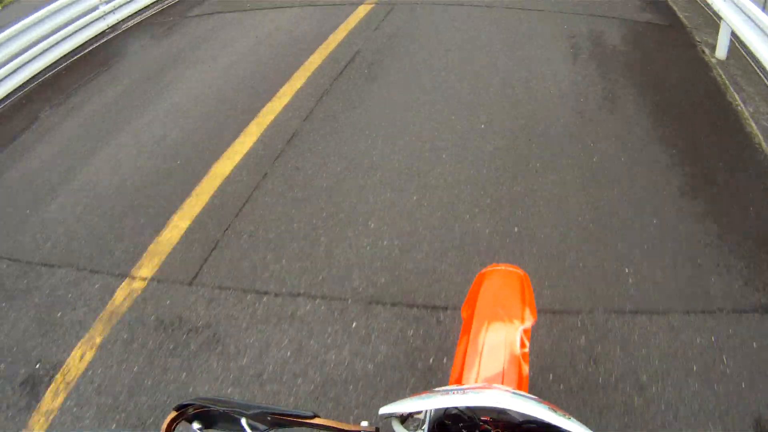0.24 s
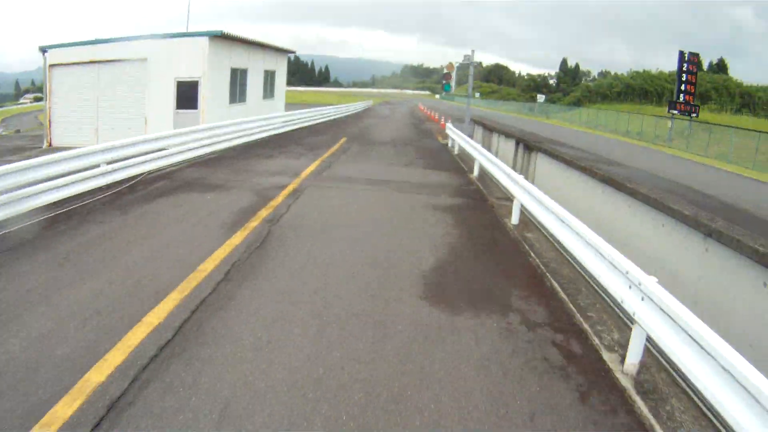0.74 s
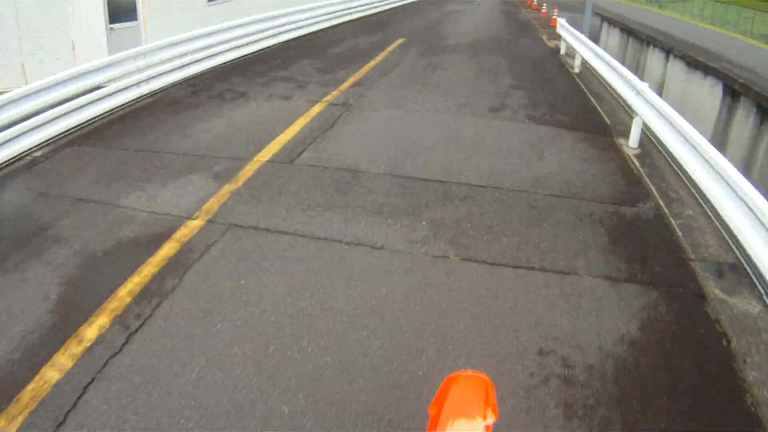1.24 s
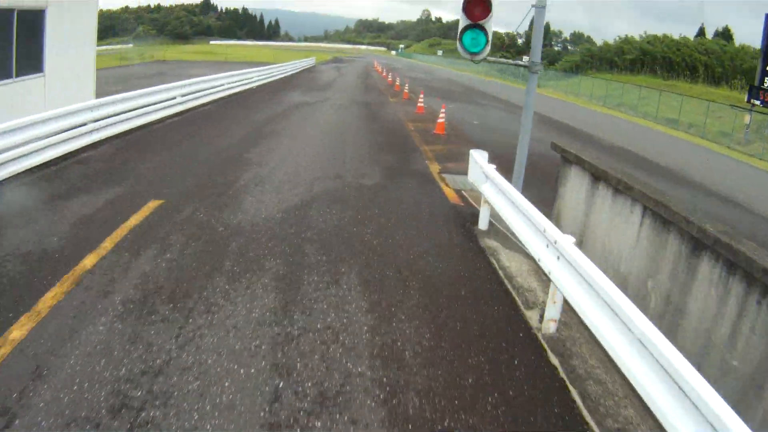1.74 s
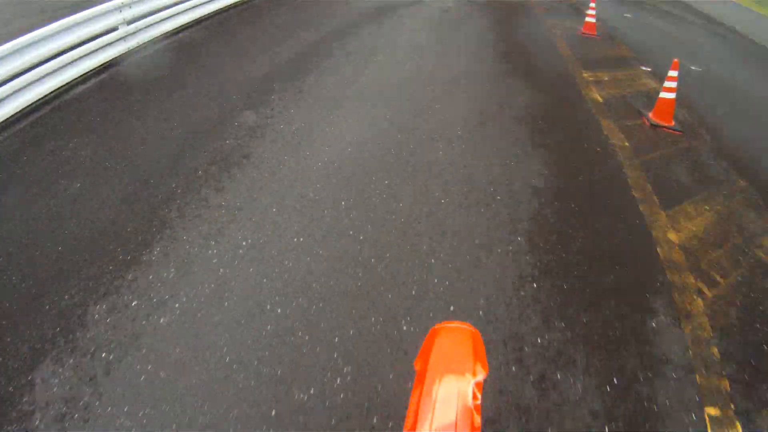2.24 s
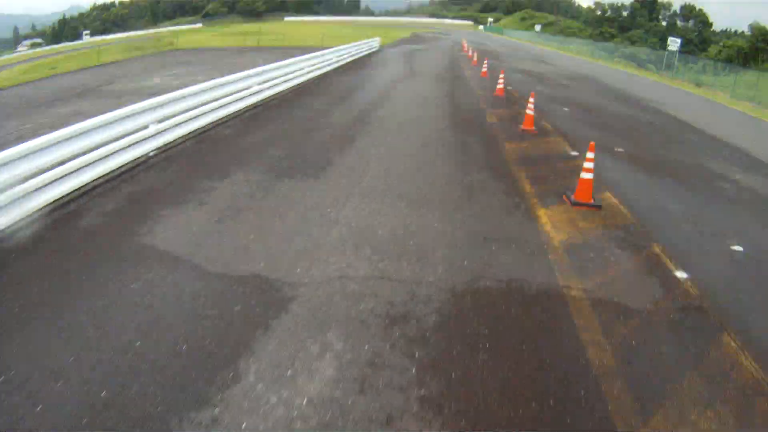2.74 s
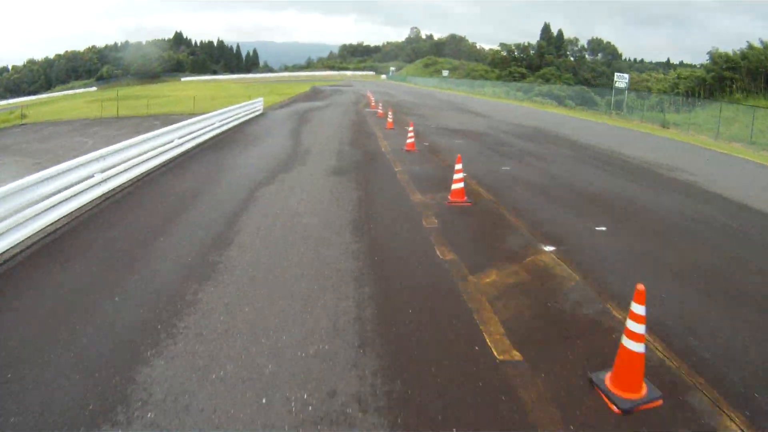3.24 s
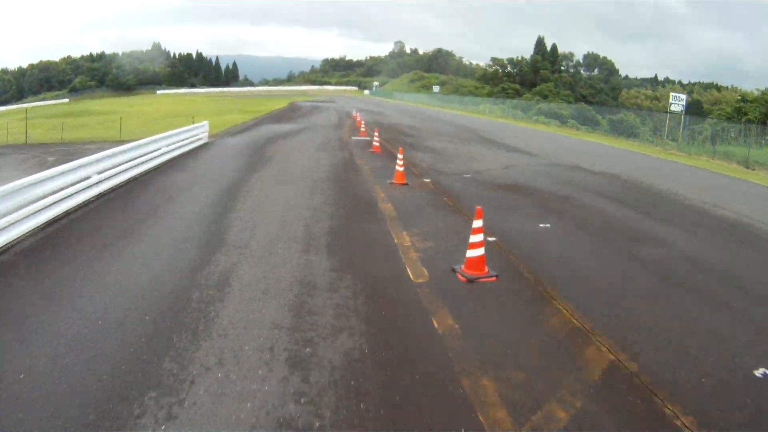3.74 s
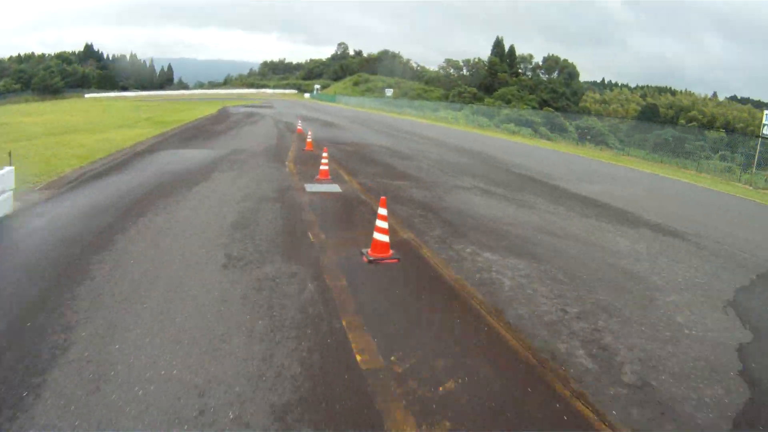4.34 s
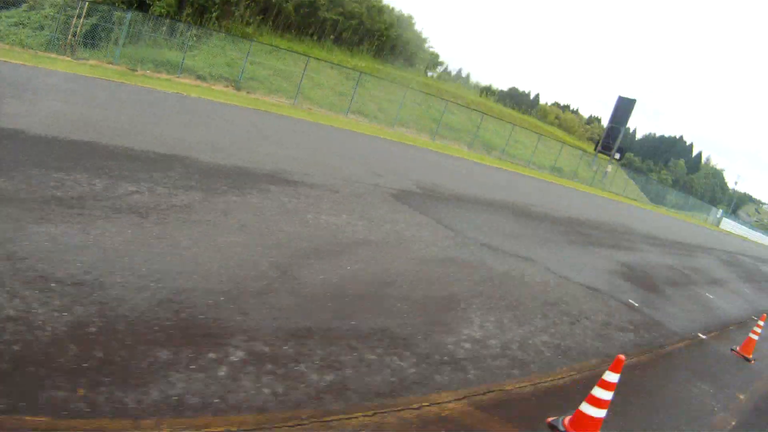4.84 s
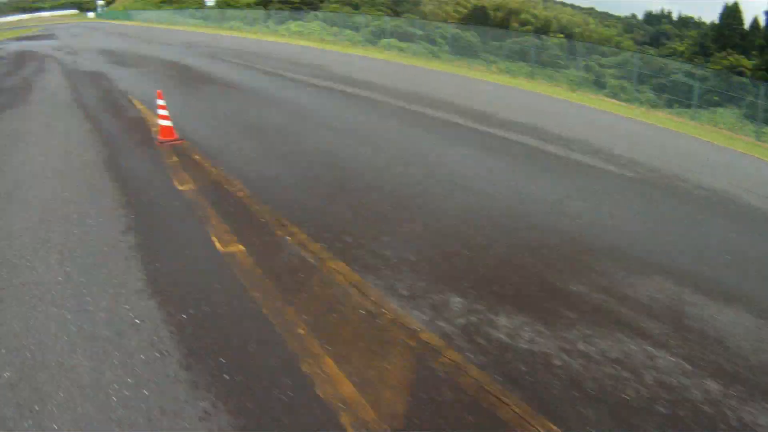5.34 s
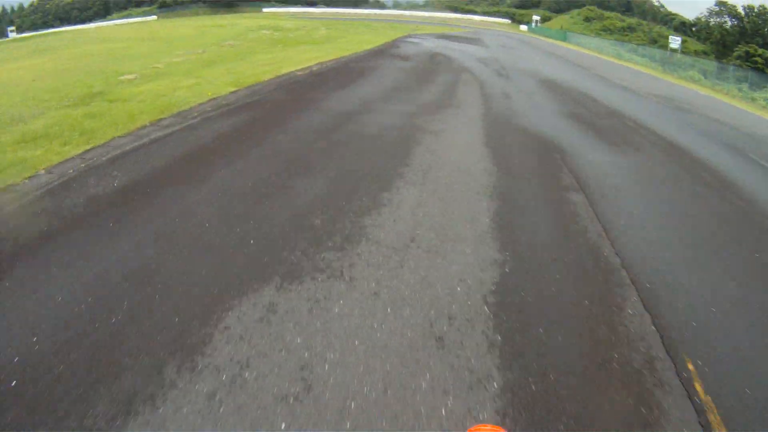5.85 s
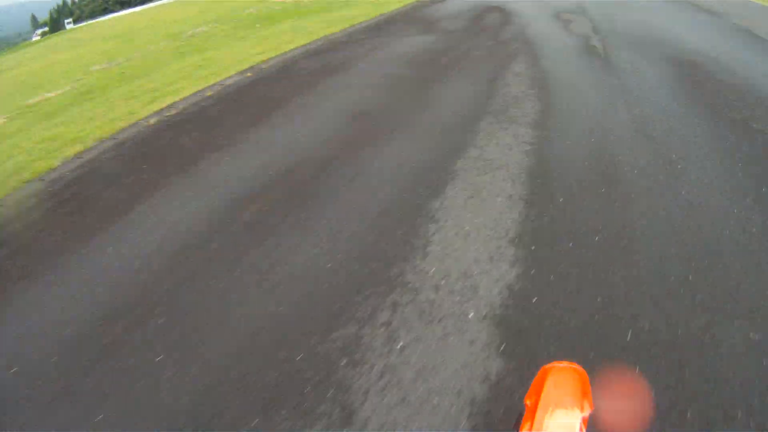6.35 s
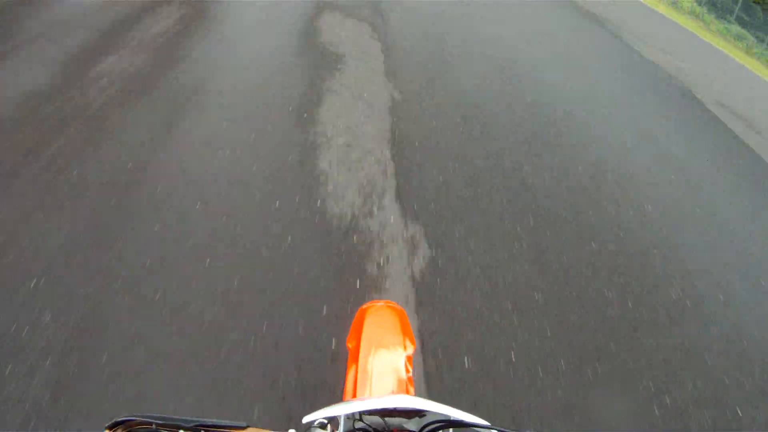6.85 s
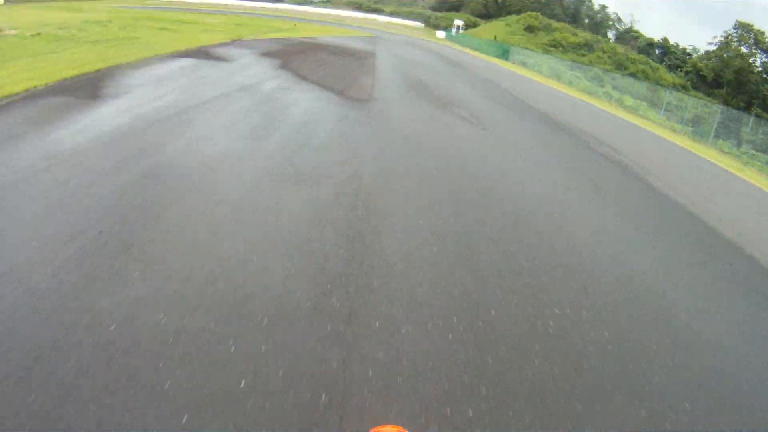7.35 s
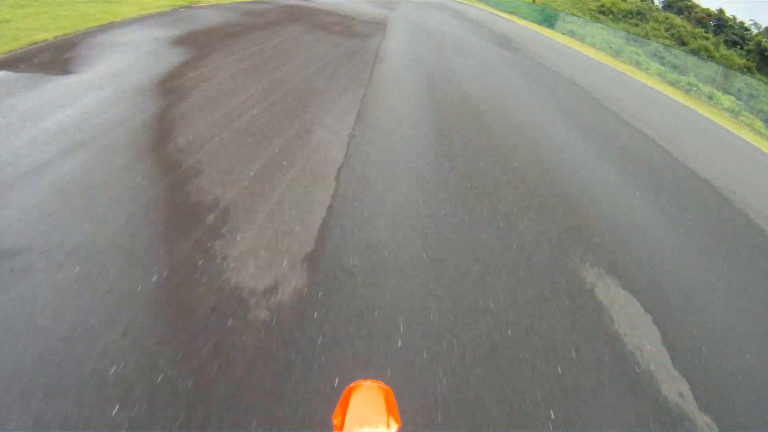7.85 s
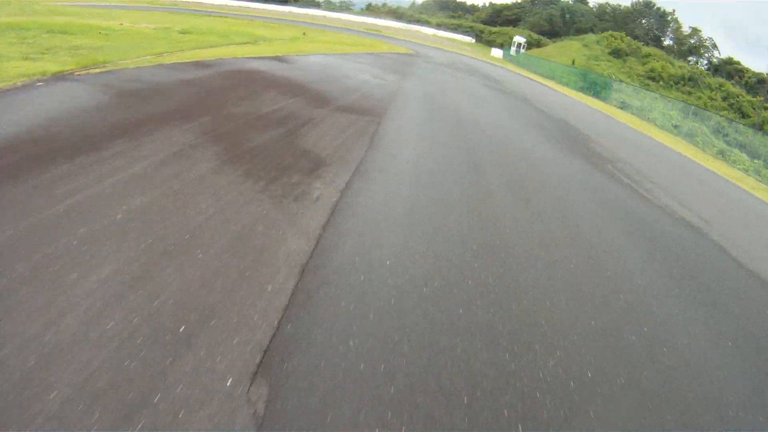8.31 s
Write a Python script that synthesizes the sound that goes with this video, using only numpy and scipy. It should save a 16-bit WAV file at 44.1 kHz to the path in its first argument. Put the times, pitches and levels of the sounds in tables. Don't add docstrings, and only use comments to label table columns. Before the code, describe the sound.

A single-cylinder motorcycle accelerates on open road, shifts up once around four seconds, while wind roar grows over a gritty, low-quality helmet microphone.

```python
import sys
import numpy as np
from scipy import signal
from scipy.fft import rfft, irfft
from scipy.io import wavfile
from scipy.ndimage import uniform_filter1d

SR = 44100
rng = np.random.default_rng(int(sys.argv[2]) if len(sys.argv) > 2 else 0)


def output_pcm(signal):
    pcm = np.clip(np.atleast_2d(signal).T, -1, 1) * 32767
    wavfile.write(sys.argv[1], SR, np.round(pcm).astype(np.int16))


def ratio(d):
    e = np.asarray(d, float) / 20
    return 10 ** e


N = 378378
T = np.arange(N) / SR

# time in seconds, roar in dB, side-wind brightness in dB.
WIND = [(0, -30, -4), (.5, -29.5, -1.5), (.8, -28, -1), (1.2, -27, -0.5), (2.4, -26.5, -0.5),
        (3.0, -25, -1.5), (3.35, -26, -.5), (4.0, -23.5, -.5), (4.4, -21.5, -1.5), (4.8, -23.5, 3.5),
        (5.38, -25, 4), (5.7, -21.5, -1), (6.3, -20, 3), (6.6, -19, 2), (6.92, -20.5, -2), (7.2, -19, -1),
        (7.7, -17.5, 1.5), (8.58, -19, 1.3)]
# time in seconds, engine cycles in Hz.
CYCLE_RATE = [(0, 24.78), (.15, 26.05), (.6, 27.96), (1.3, 30.51), (2.1, 32.55), (2.9, 35), (3.3, 35.64),
              (3.6, 36.59), (3.71, 35.83), (3.8, 33.82), (3.88, 30.25), (3.95, 29.19), (4.1, 30.17),
              (4.6, 31.17), (5.5, 32.7), (6.8, 34.42), (7.7, 35.08), (8.58, 35.22)]
MID_ROAR_DB = -24
GUST_HZ = 4.8


def curve(table, column):
    rows = np.array(table)
    return np.interp(T, rows[:, 0], rows[:, column])


def amp_of(table, column):
    return ratio(curve(table, column))


def evened(x):
    return x / np.sqrt(np.mean(x ** 2) + 1e-20)


def read(points, hz):
    f, value = np.transpose(points)
    return np.interp(np.log(hz + 1), np.log(f + 1), value)


def add(mix, start_s, sound):
    part = mix[round(start_s * SR):][:len(sound)]
    part += sound[:len(part)]


def bell(centre_s, length_s):
    return np.exp(-(2 * (T - centre_s) / length_s) ** 2)


def wander(rate_hz):
    b, a = signal.butter(2, rate_hz, fs=SR)
    return evened(signal.lfilter(b, a, rng.standard_normal(N)))


def lumps(rate_hz, depth_db):
    return ratio(depth_db * wander(rate_hz))


def whistle(hz, width_hz):
    radius = np.exp(-np.pi * width_hz / SR)
    poles = [1, -2 * radius * np.cos(2 * np.pi * hz / SR), radius * radius]
    noise = signal.lfilter([1, -1], poles, rng.standard_normal(N))
    return evened(signal.lfilter([1, -1], poles, noise))


def puff(hz, swell_ms):
    t = T[:SR // 8]
    u = t / (swell_ms / 1000)
    return u * np.exp(1 - u) * np.sin(2 * np.pi * hz * t)


def follows(level_db, slope):
    return ratio(level_db + slope * (curve(WIND, 1) - MID_ROAR_DB))


def gusts(column):
    # centre in seconds, lift in dB, brightness in dB, length in seconds.
    gust_rows = [(2.6, -2, -4, .25), (4.7, 0, 3, .08), (4.8, -1.5, -2, .1), (4.94, 2, -1, .1),
                 (5.03, -2, 0, .08), (5.17, 5.5, -1, .2), (6.05, 1, 5, .18), (7.08, 1, 1, .15)]
    return sum(row[column] * bell(row[0], row[3]) for row in gust_rows)


def roar(turns):
    # frequency in Hz, density in dB per Hz.
    slow_roar = [(380, -39), (650, -4.5), (789, -9.5), (865, -3), (940, -12), (1040, 1), (1560, -1),
                 (1860, -5), (2100, 0.5), (2370, 0.5), (2950, -9.5), (4040, -9.5), (4350, -11),
                 (5230, -19.5), (5900, -14.5), (7670, -58), (13000, -120)]
    fast_roar = [(380, -40), (650, -6), (687, -13.5), (923, -16.5), (1070, -3), (1230, 0.5), (1550, 1),
                 (1760, -6.5), (2260, 4), (2870, -7.5), (3620, -8), (4040, -9.5), (4510, -17.5),
                 (5140, -21.5), (5900, -9), (7670, -55), (13000, -120)]
    # frequency in Hz, width in Hz, lift in dB.
    cavities = [(842, 51, 8), (1054, 95, 3.5), (2280, 590, 2), (3035, 85, 4), (3594, 520, 7),
                (4032, 154, 5.5), (4850, 200, 4.5), (5127, 246, 9), (6050, 170, 8)]
    patchy_db, flicker_db, gust_db, gust_bright_db = 1.1, .65, .3, .6
    mid_flow, flow_per_db, flow_wander = .46, .091 - .031, .091
    throb = .17

    hop, size = 128, 512
    frames, hz = N // hop + 5, np.fft.rfftfreq(size, 1 / SR)
    frame_at = np.arange(frames) * hop
    a, b, patches = rng.standard_normal((frames, len(hz), 3)).T
    patches = evened(uniform_filter1d(uniform_filter1d(patches, 5, 0), 14, 1))

    flow = mid_flow + flow_per_db * (curve(WIND, 1) - MID_ROAR_DB) + flow_wander * wander(GUST_HZ)
    flow = np.clip(np.interp(frame_at, np.arange(N), flow), -.3, 1.3)
    colour_db = read(slow_roar, hz)[:, None] * (1 - flow) + read(fast_roar, hz)[:, None] * flow
    bright_db = curve(WIND, 2) + gusts(column=2) + gust_bright_db * wander(GUST_HZ)
    bright_db = np.interp(frame_at, np.arange(N), bright_db)
    colour_db += bright_db / (1 + (2900 / (hz[:, None] + 1)) ** 6)

    z = (a + 1j * b) * ratio(colour_db + patchy_db * patches)
    z /= np.sqrt(np.sum(ratio(colour_db) ** 2, 0))
    air = signal.istft(z, nperseg=size, noverlap=size - hop)[1][:N]

    hz = np.fft.rfftfreq(N, 1 / SR)
    lift_db = sum(db / (1 + (2 * (hz - f) / width_hz) ** 2) for f, width_hz, db in cavities)
    air = evened(irfft(rfft(air) * ratio(lift_db), N))

    share = np.minimum(ratio(-30) / amp_of(WIND, 1), 1) ** .7
    clatter = 1 + throb * share * np.cos(2 * np.pi * (turns - .25))
    gusting = lumps(120, flicker_db) * lumps(GUST_HZ, gust_db) * ratio(gusts(column=1))
    return amp_of(WIND, 1) * air * gusting * clatter


def rocking():
    # centre in seconds, peak in dB, length in seconds.
    bumps = [(.78, -25.5, .14), (1.348, -32.5, .15), (1.86, -34, .12), (2.979, -28, .12), (3.25, -32, .2),
             (3.9, -28, .15), (4.328, -30, .13), (4.751, -27, .3), (5.378, -30, .15), (6.454, -30, .2),
             (6.8, -30.5, .15), (7.02, -25, 0.17), (7.62, -32, .3), (7.952, -31, .15), (8.223, -24, .17),
             (8.496, -35, .15)]
    mount_hz = 33.1
    mount = follows(-39, .45) * (.98 * whistle(33, 14) + .33 * whistle(45, 77))
    swings = sum(ratio(db) * bell(s, length_s) * np.sin(2 * np.pi * mount_hz * (T - s))
                 for s, db, length_s in bumps)
    return mount + swings


def eddies():
    lumpy = follows(-41, .9) * whistle(130, 85) * lumps(18, 2.5)
    wash = amp_of(WIND, 1) * ratio(-23.5) * whistle(380, 500)
    return lumpy + wash


def moaning():
    # frequency in Hz, width in Hz, level in dB.
    moans = [(520.3, 30, 1.5), (604.6, 56, 3.5)]
    # centre in seconds, lift in dB, length in seconds.
    swells = [(.55, 4, .4), (2.35, 6, 0.28), (6.65, 2, .15), (7.55, 4.5, .3), (7.85, 4.5, 0.23),
              (8.124, 9, 0.16), (8.28, 5, .12), (8.57, 11, .1)]
    moan = sum(ratio(db) * whistle(hz, width_hz) * lumps(6.9, .75) for hz, width_hz, db in moans)
    swell_db = sum(db * bell(s, length_s) for s, db, length_s in swells)
    return follows(-41, .82) * ratio(swell_db - 6) * moan


def seam():
    return ratio(-28.5) * bell(centre_s=6.05, length_s=.13) * whistle(hz=3950, width_hz=200)


def rattle(turns):
    # frequency in Hz, width in Hz, level in dB rms.
    panels = [(1074, 110, -41.5), (2310, 260, -45)]
    buzz = sum(ratio(db) * whistle(hz, width_hz) for hz, width_hz, db in panels)
    return buzz * (1 + .7 * np.cos(2 * np.pi * (turns - .3)))


def tick(hz, swell_ms):
    sag, sag_ms = .28, .7
    t = T[:SR // 50]
    u = t / (swell_ms / 1000)
    glide = 1 - sag * np.exp(-t * 1000 / sag_ms)
    return u * np.exp(1 - u) * np.sin(2 * np.pi * hz * np.cumsum(glide) / SR)


def grit():
    # start in seconds, peak in dB, high mode in Hz, low mode in Hz, low mode in dB.
    grains = [
        (.7317, -19.5, 2300, 980, 8),
        (2.4870, -1, 2400, 1120, -6),
        (4.9230, -1.5, 2380, 1120, -5),
        (4.9627, 3, 2800, 1950, -5),
        (4.9642, -5, 2250, 1230, 1),
        (4.9662, -11, 2850, 1230, 1),
    ]
    swell_ms = .83
    out = np.zeros(N)
    for s, peak_db, high_hz, low_hz, low_db in grains:
        ring = tick(high_hz, swell_ms) + ratio(low_db) * tick(low_hz, 1.1 * swell_ms)
        add(out, s, ratio(peak_db) * ring)
    return out


def thumps():
    # start in seconds, peak in dB, frequency in Hz, swell in ms.
    blows = [(.7318, -22, 520, 1.2), (2.4872, -15, 800, 1.1), (2.487, -21, 280, 2.5),
             (4.9645, -12, 800, 1.1), (4.821, -26, 131, 22), (5.145, -30, 150, 7.9),
             (5.23, -16.5, 148, 9.3), (5.265, -20, 131, 15), (5.332, -29, 140, 12), (5.509, -24.5, 163, 17)]
    out = np.zeros(N)
    for s, peak_db, hz, swell_ms in blows:
        add(out, s, ratio(peak_db) * puff(hz, swell_ms))
    return out


def jolts():
    # start in seconds, peak in dB, start in Hz, end in Hz, t60 in seconds.
    swings = [
        (2.5, -26, 45, 33.5, .6),
        (4.974, -8, 76.5, 31.6, 0.4),
        (5.985, -17.5, 69, 32.6, .6),
    ]
    t = T[:SR // 2]
    out = np.zeros(N)
    for s, peak_db, start_hz, end_hz, t60_s in swings:
        hz = end_hz + (start_hz - end_hz) * np.exp(-t / .03)
        swell = ratio(peak_db - 60 * t / t60_s) * (1 - np.exp(-t / .004))
        add(out, s, swell * np.sin(2 * np.pi * np.cumsum(hz) / SR))
    return out


def knocks():
    high_pass = signal.butter(2, 25, "high", fs=SR, output="sos")
    return signal.sosfilt(high_pass, grit() + thumps() + jolts())


def combustion():
    cut_s, cut_length_s, cut_left = 3.715, .125, .05
    relight_gain, stumble, relight_s = .9, .3, .05
    back_s = cut_s + cut_length_s
    relight = 1 + relight_gain * bell(back_s, relight_s) - stumble * bell(back_s + relight_s, relight_s)
    return np.where(T > back_s, relight, np.where(T > cut_s, cut_left, 1))


def pulses(turns, table):
    uneven_db, jitter_ms = 1.1, .07
    out, cycles = np.zeros(N), np.arange(0, int(turns[-1]) + 1)
    luck = rng.standard_normal((320, 2))[:len(cycles)]
    for share, size, hz, swell_ms in table:
        at = np.interp(cycles + share, turns, np.arange(N)) + luck[:, 0] * jitter_ms * SR / 1000
        train = np.zeros(N)
        train[np.clip(at, 0, N - 1).astype(int)] = size * ratio(uneven_db * luck[:, 1])
        out += signal.oaconvolve(train, puff(hz, swell_ms))[:N]
    return out


def shaking(turns):
    crank = ratio(-40) * np.sqrt(2) * np.sin(2 * np.pi * (2 * turns - .13))
    growth = (curve(CYCLE_RATE, 1) / 33) ** 4
    piston = ratio(-45) * growth * np.sqrt(2) * np.sin(2 * np.pi * (4 * turns - .15))
    return crank + piston


def engine(turns):
    # time in seconds, pulse size in dB, silencer ring 0-1.
    load = [(0, -20.5, 0), (.4, -20, .3), (.7, -21.5, 1), (1.6, -20.3, .85), (2.2, -19.6, .95),
            (2.8, -21.3, .6), (3.4, -21, 0), (3.7, -20, 0), (4, -18, 1), (4.6, -17.5, .9), (5.6, -19, .6),
            (6.6, -20, .4), (7.4, -20.7, 0)]
    # share of the cycle, signed size, frequency in Hz, swell in ms.
    intake = [(.144, -.69, 210, 2.6), (.232, .25, 330, 1.3), (.28, .53, 185, 1.06)]
    exhaust = [(-.037, -.8, 225, 2), (.115, -.19, 437, 3.5), (.55, .12, 230, 1.5)]
    silencer = [(.127, -.3, 320, 3), (.3, .16, 480, 3.2)]
    overrun = [(.135, -.75, 185, 2.4)]
    firing = combustion()
    blow = pulses(turns, exhaust) + curve(load, 2) * pulses(turns, silencer)
    gulp = pulses(turns, intake) + np.maximum(1 - firing, 0) * pulses(turns, overrun)
    return amp_of(load, 1) * 1.12 * (firing * blow + gulp) + shaking(turns)


def scene():
    turns = np.cumsum(curve(CYCLE_RATE, 1)) / SR - .44
    wind = roar(turns) + rocking() + eddies() + moaning() + seam()
    return (wind + rattle(turns) + knocks() + engine(turns))[None]


def ducked(x):
    start_db, recover_db_per_s = -10.5, 70
    power_db = 10 * np.log10(abs(uniform_filter1d(x[0] ** 2, 260, origin=129)) + 1e-12)
    recovery_db = recover_db_per_s * T
    held_db = np.maximum.accumulate(power_db + recovery_db) - recovery_db
    over_db = np.maximum(held_db - start_db, 0)
    return x / ratio(uniform_filter1d(over_db, 300, origin=149))


def roll_off(x):
    return signal.sosfilt(signal.butter(12, 15820, fs=SR, output="sos"), x)


def record(dry):
    guard = signal.firwin(161, 5900, fs=SR)
    dry = signal.oaconvolve(ducked(dry), guard[None], "same")
    coarse = np.clip(signal.resample_poly(dry, 40, 147, axis=1), -1, 1)
    held = signal.resample_poly(np.repeat(coarse, 4, axis=1), 147, 160, axis=1)[:, :N]
    held = np.pad(held, ((0, 0), (0, N - held.shape[1])))
    edge = signal.firwin(511, 15350, window=("kaiser", 9), fs=SR)
    return roll_off(np.clip(signal.oaconvolve(held, edge[None], "same"), -1, 1))


dry = scene()
out = record(dry)
output_pcm(out)
```